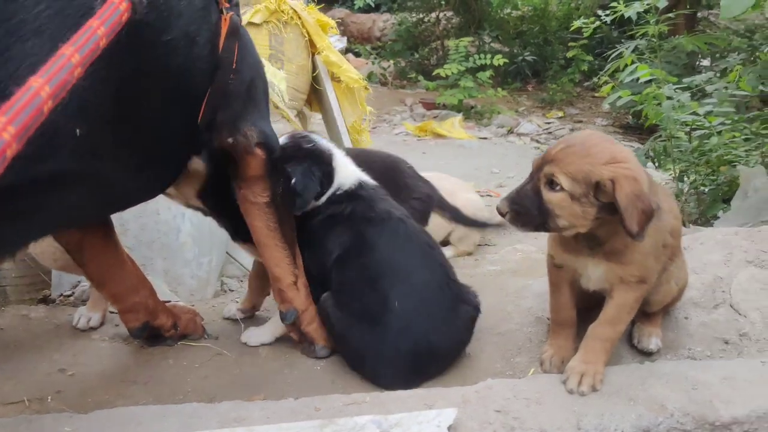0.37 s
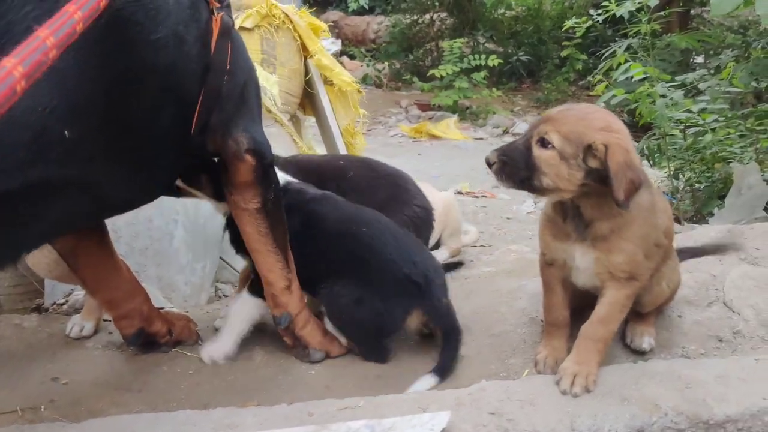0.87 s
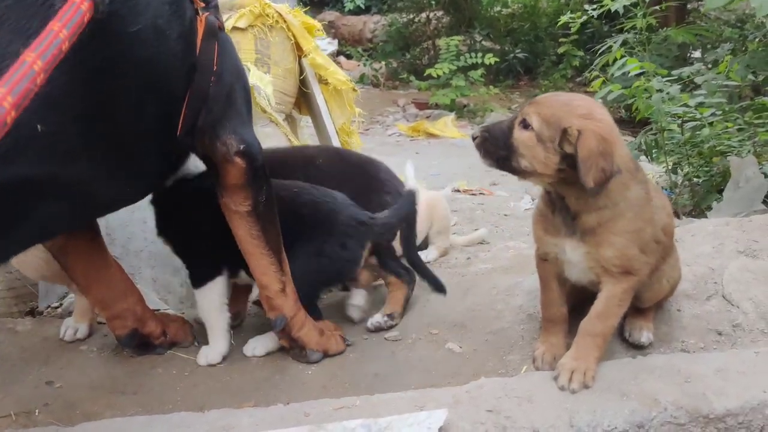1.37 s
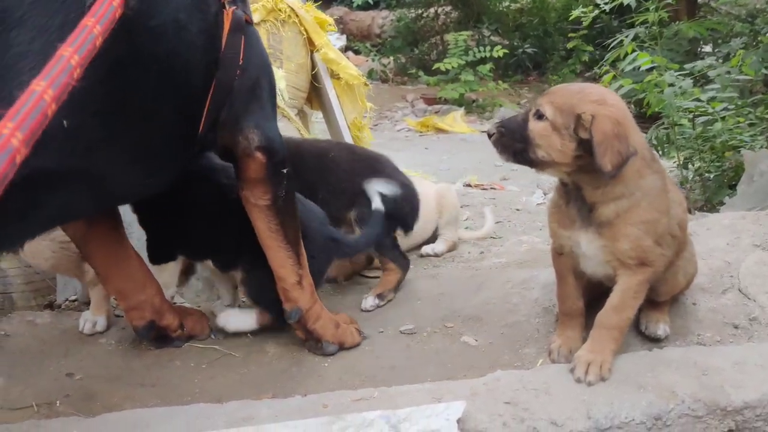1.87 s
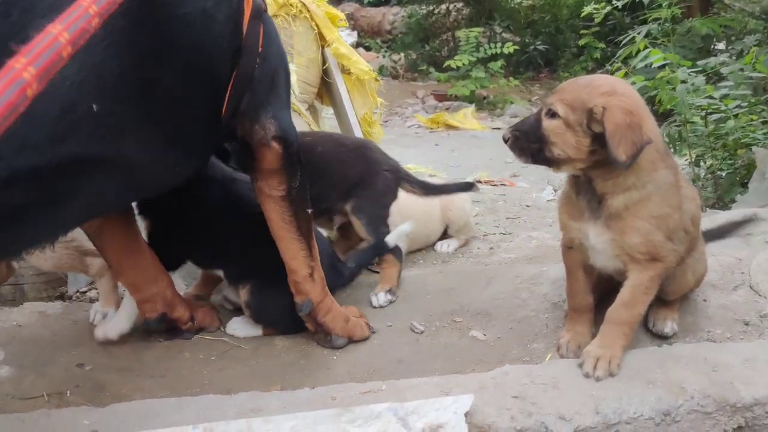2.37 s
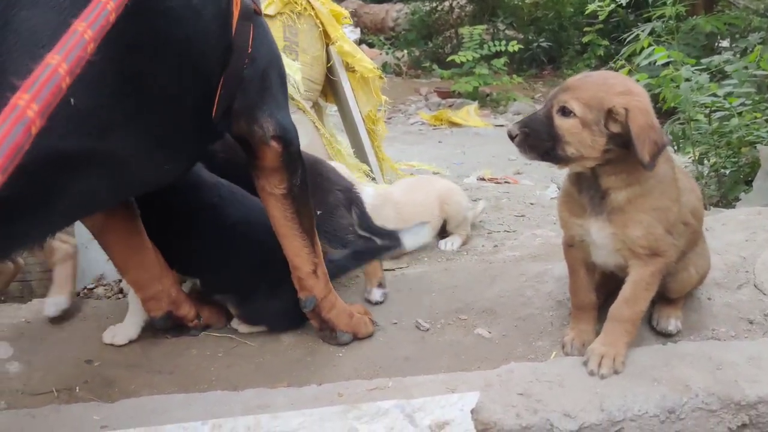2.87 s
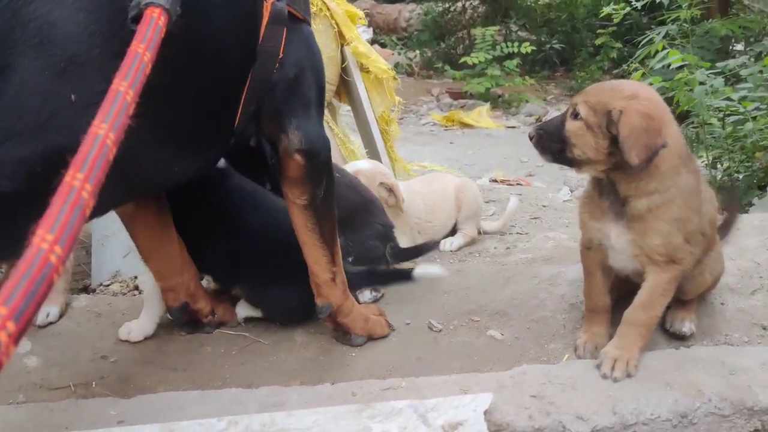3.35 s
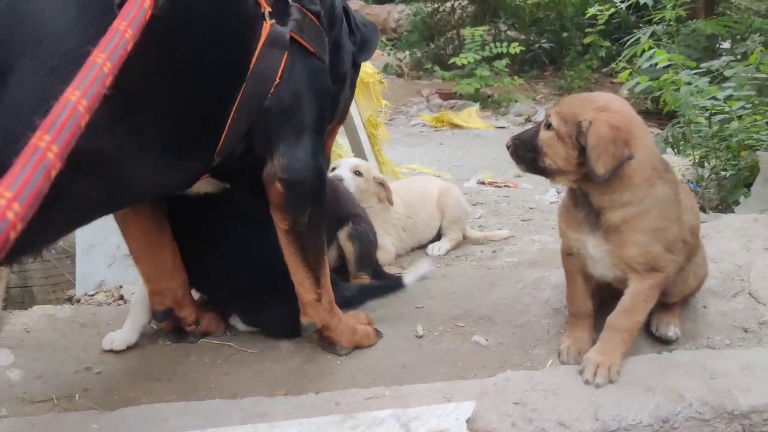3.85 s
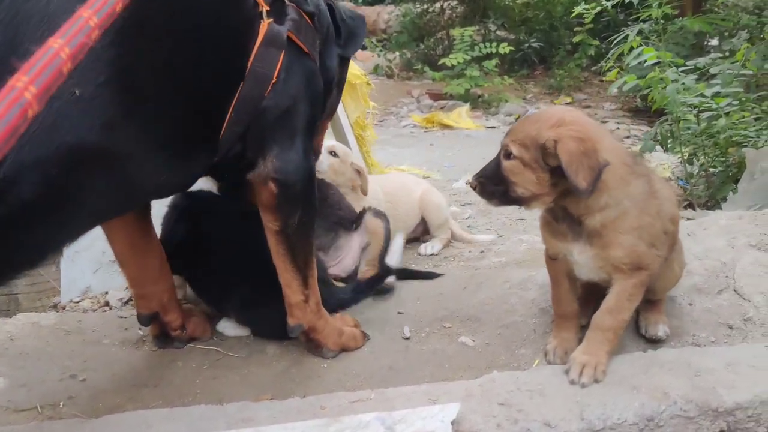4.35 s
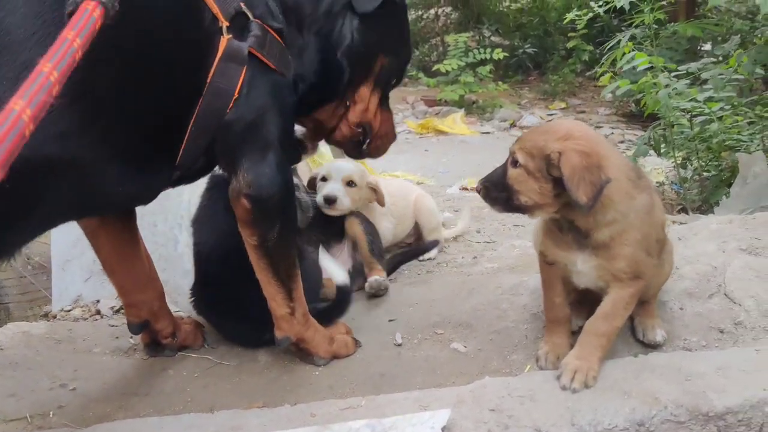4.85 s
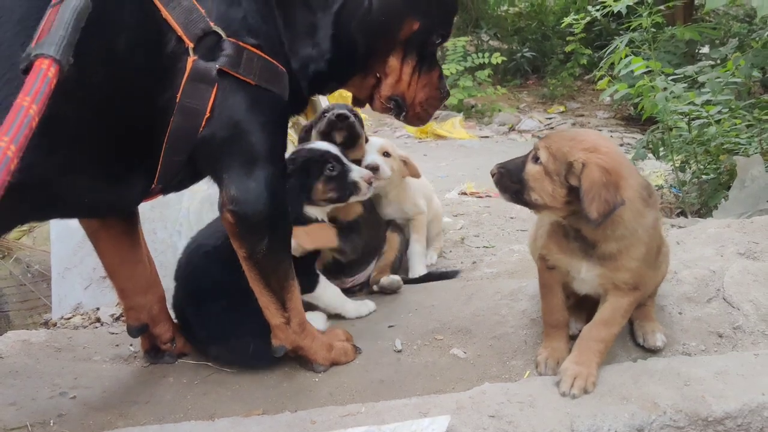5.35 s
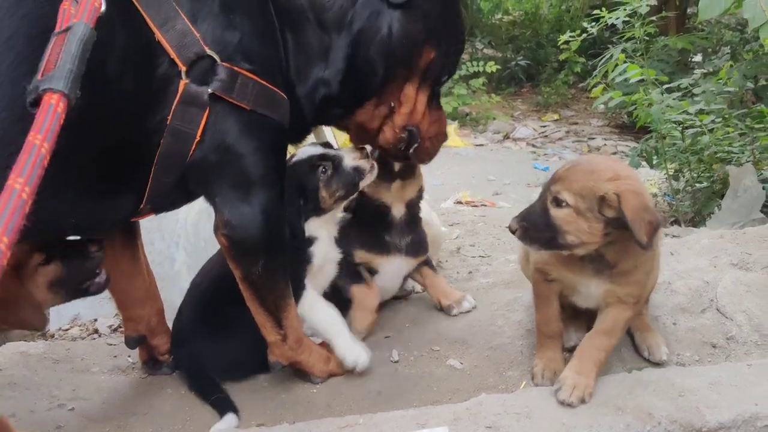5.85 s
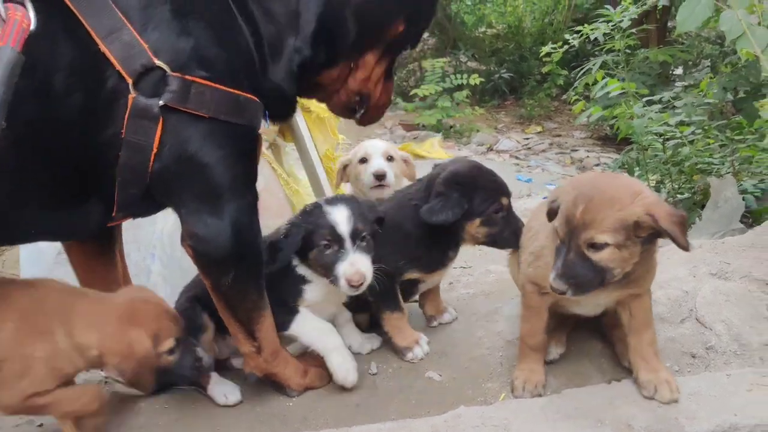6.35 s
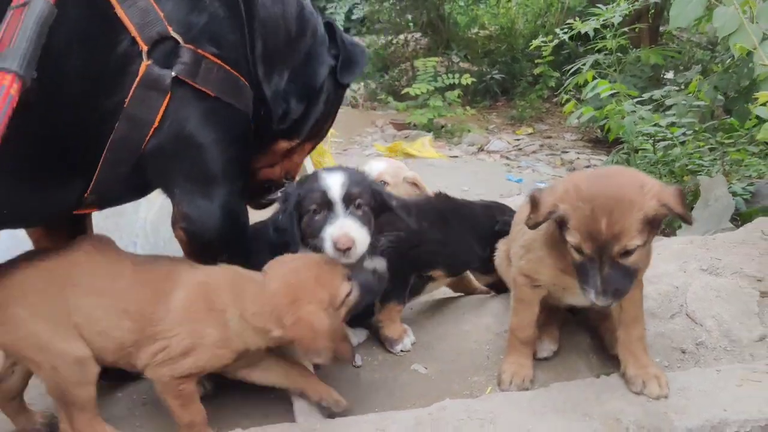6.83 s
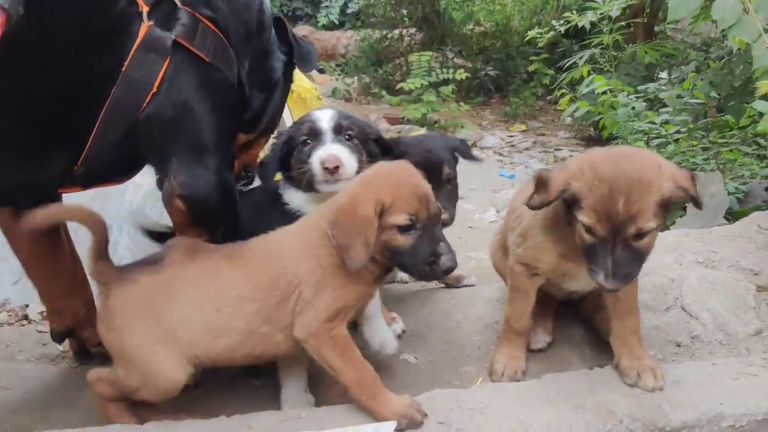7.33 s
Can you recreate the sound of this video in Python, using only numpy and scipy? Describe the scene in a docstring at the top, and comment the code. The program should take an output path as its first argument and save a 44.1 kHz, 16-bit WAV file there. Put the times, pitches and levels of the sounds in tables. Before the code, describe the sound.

A small bird repeats quick high chirps in an echoing lane over a low distant generator hum, with puppy gulp-grunts and three sharp snaps close by.

```python
"""From the start a small bird in a walled lane repeats a chirp of whistled glides, its last sweep answered by
an echo. A generator hums far off (wavering harmonics) under air noise and faint insects (narrow-band noise).
At 0.6, 1.7 and 5.7 s a puppy gulps (knocked resonances) and grunts (gliding tones) close by; paws rustle (noise).
From 3.4 s ticks (single clicks into resonances) lead into three snaps (click trains) at 3.9, 4.1 and 4.2 s.
A last tick falls at 5.1 s, the last chirp at 7.5 s. Of two microphone ports, the left hears all a little earlier."""
import sys
import numpy as np
from scipy import signal
from scipy.fft import rfft, irfft
from scipy.io import wavfile
from scipy.ndimage import uniform_filter1d

SR = 44100
rng = np.random.default_rng(int(sys.argv[2]) if len(sys.argv) > 2 else 0)


def ratio(d):
    """dB to gain"""
    e = np.asarray(d, float) / 20
    return 10 ** e


def generate_wav(sig):
    """Save sig (samples, or channels by samples) to the path in sys.argv[1] as 16-bit PCM at SR."""
    pcm = np.round(np.clip(np.atleast_2d(sig).T, -1, 1) * 32767).astype(np.int16)
    wavfile.write(sys.argv[1], SR, pcm)


N = 340046

# Bird chirps: (time [s], base level [dB], pitch factor)
CHIRPS = [(-.055, -48, 1.055), (1.243, -38, 1.033), (1.483, -36, 1.023), (1.732, -36, 1.038),
          (1.985, -36.5, 1.023), (2.237, -35, 1.03), (2.496, -36.5, 1.034), (2.763, -36, 1.016),
          (4.644, -38, 1.032), (4.895, -37, 1.01), (5.154, -36.5, 1.02), (5.415, -36.5, 1.032),
          (5.684, -37, 1.015), (7.482, -39.5, 1.027)]
# Glides of one chirp, the last row an echo of the sweep; pitches before the chirp factor and the whistle ratio:
# (time after chirp start [s], length [s], start pitch [Hz], resting pitch [Hz], base level [dB])
CHIRP_GLIDES = [(-.026, .015, 4650, 4175, -11.5), (-.006, .028, 4600, 4437, -8),
                (0.014, .018, 5750, 4574, -4.5), (0.032, .051, 5898, 3531, -5),
                (0.073, .035, 4800, 3792, -6)]
# Wall echoes of the bird: (delay [s], left level [dB], right level [dB])
WALL_ECHOES = [(.011, -5.5, -34), (.045, -24, -10.5), (.095, -32, -20)]
# Puppy grunts: (time [s], length [s], base pitch [Hz], base level [dB])
GRUNTS = [(0.556, 0.14, 195.3, -30.5), (1.725, 0.11, 199.5, -28.5), (5.734, 0.122, 186.2, -26)]
# Grunt contour, pitch sagging then climbing: (share of length, pitch factor, level [dB])
GRUNT_CONTOUR = [(0, 1.02, -6), (0.051, 1.03, -5.5), (.47, 0.94, -7), (.78, 1.12, -7.5), (1, 1.5, -18)]
# Grunt harmonics: (multiple, level [dB])
GRUNT_HARMONICS = [(1, -1.5), (2, -16)]
# Puppy gulps: (time [s], level [dB], added level of the modes above 450 Hz [dB])
GULPS = [(0.56, -27, -15), (0.656, -34, -18), (1.733, -19.5, -8.5), (1.777, -21.5, -10), (1.806, -28, -10),
         (5.738, -16, -11.5), (5.779, -30.5, -20), (5.815, -23, -4.5)]
# Throat cavity modes: (frequency [Hz], level [dB], T60 [s])
THROAT_MODES = [(372, -0.5, 0.036), (578, -12, 0.15), (770, -17, 0.046), (980, -8.5, 0.18)]
# Snap envelopes: (time [s], swell [s], peak rms before panning [dB], fall [dB/s])
SNAP_ENVELOPES = [(3.8787, 0.0064, -12.5, 1700), (4.0539, 0.0065, -14, 2100), (4.2334, 0.01, -15, 1050)]
# Snap colours, one per snap: (main resonance [Hz], width [Hz], grain rate [1/s],
# body level [dB], added body treble [dB], left minus right [dB])
SNAP_COLOURS = [(4500, 1100, 1400, -18, -4, -5.5), (4240, 1050, 1600, -25, 15, -4.5),
                (3710, 610, 2100, -29.5, 12, -3)]
# Body resonances of snaps and ticks: (frequency [Hz], width [Hz], level [dB])
CRACK_BODY = [(900, 450, -25), (1566, 470, -13.5), (2240, 630, -5), (3000, 280, -4), (8250, 1100, 8),
              (9590, 1170, 6.5), (14000, 1700, 6.5)]
# Ticks: (time [s], level [dB], main resonance [Hz], body level [dB], added body treble [dB])
TICKS = [(3.421, -47, 2320, 4, -13), (3.490, -40.5, 3600, 1, -10), (3.497, -35, 3400, -4, -14),
         (3.569, -31.5, 2550, 6, -25), (3.639, -37, 980, 5.5, -21), (3.714, -32, 2430, -3.5, -17),
         (3.844, -50, 5000, -10, 13), (3.853, -34.5, 4970, -1, 5), (3.865, -31, 4500, -21, 6),
         (3.869, -22, 4220, -22, -3), (3.874, -20, 4120, -26, -4), (3.8936, -16, 4500, 2, -10),
         (4.073, -28, 2830, -5, -21), (4.136, -38, 1060, -11, -17), (4.259, -21.5, 3370, 0, -25),
         (5.057, -38, 3003, -1, -15)]
# Rustles: (time [s], fade scale [s], scuff level [dB], leaf level over scuff, before an 8 dB cut [dB])
RUSTLES = [(0.726, 0.27, -53.5, 0), (1.207, 0.055, -51.5, 4), (3.098, 0.17, -43, -2.5),
           (3.395, 0.32, -54, -7), (3.562, 0.022, -40.5, -6), (4.41, 0.031, -55, 10),
           (4.78, 0.27, -55.5, 1), (5.272, 0.2, -53, -1), (6.782, 0.03, -57.5, 17), (6.89, .03, -61, 9)]
# Scuff spectrum: (frequency [Hz], relative density [dB per Hz])
SCUFF_SPECTRUM = [(300, 4), (700, 10.5), (1500, 1), (2900, 10), (4500, -0.5), (6000, -6)]
# Generator harmonics: (multiple, level [dB])
HUM_HARMONICS = [(1, -1), (2, -14.5), (3, -17), (4, -22.5), (5, -31), (6, -29)]
# Far traffic and air spectrum: (frequency [Hz], relative density [dB per Hz])
AIR_SPECTRUM = [(12, -34), (22, -3.5), (40, -7.5), (60, -0.5), (90, -10.5), (125, -6.5), (170, -13.5),
                (260, -17.5), (450, -21), (700, -23.5), (1100, -27.5), (2300, -25.5), (4000, -33),
                (8000, -47), (16000, -36.5)]
# Left-right likeness of diffuse noise: (frequency [Hz], likeness 0..1)
LIKENESS = [(25, 0.62), (60, 0.99), (300, 1), (1000, 0.64), (2500, 0.29), (5000, 0.067), (9000, 0.14)]
# Shadow of close sound at the left port: (frequency [Hz], level [dB])
NEAR_SHADOW = [(5500, 0), (7500, -11.5), (15000, -9)]
# Microphone housing response: (frequency [Hz], level [dB])
HOUSING = [(4800, 0), (5500, -3.5), (6300, -9), (7200, -3.5), (8200, -2), (11000, -9), (15500, -15),
           (15900, -71)]
# Port mismatch: (frequency [Hz], left minus right [dB])
PORT_MISMATCH = [(60, -1), (110, -0.5), (200, 1), (380, -1), (700, 0.5), (1290, -4), (2380, -9),
                 (4400, 2.5), (8120, 1), (15000, -1)]

WHISTLE_RATIO = 0.97  # sounding pitch over table pitch
GLIDE_SETTLE_S, GLIDE_ATTACK_S, GLIDE_RELEASE_S, GLIDE_EDGE_DB = 0.0135, 0.012, 0.0021, -25.5
GLIDE_DB_PER_KHZ = 7  # effort: louder while the pitch is still high
TURN_AWAY_S, TURN_AWAY_DB = 7.0, -4.5  # the bird has turned away: less direct sound
LANE_T60_S, LANE_TREBLE_T60_S, LANE_SPLIT_HZ = 0.62, 0.5, 4400
BIRD_LANE_DB, NEAR_LANE_DB = -2, -25
SNAP_START_DB = -6  # re peak
TICK_WIDTH_SHARE = 0.2  # resonance width over its frequency
HUM_HZ, HUM_BASE_DB, HUM_WAVER_DB, HUM_WAVER_HZ = 75.0, -36.5, 0.5, 5.6
INSECT_HZ, INSECT_PASS_WIDTH_HZ, INSECT_BASE_DB = 4740, 280, -64.5
AIR_DB = -42.5
FAR_LEFT_LEAD_S, NEAR_LEFT_LEAD_S = 0.00023, 0.00004


def bird():
    """Whistled glides from one template, varied per chirp; direct sound, wall echoes and a scattered tail."""
    early = SR // 4  # room for a chirp begun before time zero
    song = np.zeros(N + 2 * early)
    for start_s, level_db, factor in CHIRPS:
        for chirp_glide in CHIRP_GLIDES:
            rows = whistle_rows(*chirp_glide) * [1, factor, 1] + [start_s, 0, level_db]
            at, tone = glide(rows, [(WHISTLE_RATIO, 0)], wobble_db=3.2)
            song[early + at:early + at + len(tone)] += tone
    turned_away = np.arange(len(song)) > early + TURN_AWAY_S * SR
    direct = song * ratio(TURN_AWAY_DB * turned_away)
    out = direct * ratio([[0.0], [-7.0]]) + ratio(BIRD_LANE_DB) * lane(song)
    for delay_s, *side_db in WALL_ECHOES:
        out += np.roll(song, round(delay_s * SR)) * ratio(side_db)[:, None]
    return out[:, early:early + N]


def whistle_rows(start_s, length_s, from_hz, toward_hz, level_db):
    """One whistled glide: pitch sags fast, then ever slower; level eases with it between soft edges."""
    t = np.linspace(0, length_s, num=14)
    above_hz = (from_hz - toward_hz) / (1 + (t / GLIDE_SETTLE_S) ** 1.973)
    attack = np.clip(1 - t / GLIDE_ATTACK_S, 0, 1)
    release = np.clip(1 - (length_s - t) / GLIDE_RELEASE_S, 0, 1)
    effort_db = GLIDE_DB_PER_KHZ * above_hz / 1000
    glide_db = level_db + effort_db + GLIDE_EDGE_DB * (attack + release)
    return np.transpose([start_s + t, toward_hz + above_hz, glide_db])


def puppy():
    """Short closed-mouth grunts as gliding harmonics; each gulp knocks the throat cavities with a soft push."""
    out = np.zeros(N)
    for start_s, length_s, pitch_hz, level_db in GRUNTS:
        rows = np.array(GRUNT_CONTOUR) * [length_s, pitch_hz, 1] + [start_s, 0, level_db]
        at, tone = glide(rows, GRUNT_HARMONICS, wobble_db=0)
        out[at:at + len(tone)] += tone
    push = high_pass(ring_wide(signal.unit_impulse(12000), 513, 345), 420) / 18
    for start_s, level_db, upper_db in GULPS:
        knock = np.zeros(len(push))
        for hz, mode_db, t60_s in THROAT_MODES:
            knock += ratio(mode_db + upper_db * (hz > 450)) * ring(push, hz, t60_s)
        out[round(start_s * SR):][:len(push)] -= ratio(level_db) * knock
    return out


def snaps():
    """Dense uneven click trains into resonances, under a quick swell and a steep fall."""
    out, t = np.zeros((2, N)), np.arange(2400) / SR
    for colour, envelope in zip(SNAP_COLOURS, SNAP_ENVELOPES):
        hz, width_hz, grains_per_s, body_db, treble_db, pan_db = colour
        start_s, swell_s, peak_db, fall_db_per_s = envelope
        rise_db = SNAP_START_DB * (1 - t / swell_s)
        level_db = peak_db + np.minimum(rise_db, fall_db_per_s * (swell_s - t))
        chance, size, sign = rng.random((3, len(t)))
        grains = (chance < grains_per_s / SR) * (0.34 + size) * np.sign(sign - 0.5)
        grains += 0.061 * (sign - 0.5)  # noise bed
        grains[0] = 1  # the first fibre breaks at once
        sound = crack(grains, hz, width_hz, body_db, treble_db)
        sound /= np.sqrt(uniform_filter1d(sound ** 2, size=110) + 1e-9)  # the envelope sets the level
        sides = ratio(np.array([[pan_db], [-pan_db]]) / 2)
        out[:, round(start_s * SR):][:, :len(t)] += sides * sound * ratio(level_db)
    return out


def ticks():
    """Each a click plus scatter decaying with a 2 ms time constant, into resonances."""
    out, t = np.zeros(N), np.arange(1200) / SR
    for start_s, level_db, hz, body_db, treble_db in TICKS:
        clicks = 0.09 * rng.standard_normal(len(t)) * np.exp(-t / 0.002)
        clicks[0] += 1
        sound = crack(clicks, hz, TICK_WIDTH_SHARE * hz, body_db, treble_db)
        out[round(start_s * SR):][:len(t)] += ratio(level_db) * sound
    return out


def crack(clicks, hz, width_hz, body_db, treble_db):
    """Clicks ring a main resonance and the fixed body resonances around it."""
    body = np.zeros(len(clicks))
    for body_hz, body_width_hz, db in CRACK_BODY:
        body += ratio(db + treble_db * (body_hz > 6000)) * ring_wide(clicks, body_hz, body_width_hz)
    return ring_wide(clicks, hz, width_hz) + ratio(body_db) * body


def rustles():
    """Paws and leaves: fluttering noise, quick onset and Gaussian fade; leaf noise adds dry treble."""
    t, out = np.arange(N) / SR, np.zeros((2, N))
    scuff = diffuse(SCUFF_SPECTRUM + [(7000, -44)])
    leaves = diffuse([(5000, -36), (6500, -2)])
    for start_s, fade_s, level_db, leaf_db in RUSTLES:
        x = np.clip((t - start_s) / fade_s, 0, 9)
        envelope = np.minimum(8 * x, 1) * np.exp(-1.5 * x ** 2)
        out += ratio(level_db) * envelope * (scuff + ratio(leaf_db - 8.0) * leaves)
    return out * ratio(2.0 * drift(120))


def generator():
    """A steady firing tone; each harmonic wavers alone, the higher the more."""
    t = np.arange(N) / SR
    phase = 2 * np.pi * HUM_HZ * t + 0.2 * drift(0.32)
    tone = np.zeros(N)
    for k, db in HUM_HARMONICS:
        tone += ratio(db + 0.64 * k * drift(7.9)) * np.sin(k * phase + 1.079 * k * k)
    return np.sqrt(2) * tone * ratio(HUM_BASE_DB + HUM_WAVER_DB * drift(HUM_WAVER_HZ))


def insects():
    """A faint far chorus: noise in a narrow band, throbbing unevenly."""
    band = rng.standard_normal((2, N))
    for _ in range(2):
        band = ring_wide(band, INSECT_HZ, INSECT_PASS_WIDTH_HZ)
    throb_db = 3 * drift(40) + 1.5 * drift(3.4)
    return ratio(INSECT_BASE_DB + throb_db) * rms_one(band)


def air():
    """Far traffic and air: steady diffuse noise, strongest in the bass."""
    return ratio(AIR_DB) * diffuse(AIR_SPECTRUM)


def lane(x):
    """Scatter between walls: unit-energy noise tail, own in each channel; the treble dies first."""
    t = np.arange(round(0.9 * SR)) / SR
    noise = rng.standard_normal((2, len(t)))
    treble = high_pass(high_pass(noise, LANE_SPLIT_HZ), LANE_SPLIT_HZ)
    tail = (noise - treble) * ratio(-60 * t / LANE_T60_S) + treble * ratio(-60 * t / LANE_TREBLE_T60_S)
    tail *= 1 - np.exp(-t / 0.00067)
    tail /= np.sqrt(np.sum(tail[0] ** 2))
    return signal.fftconvolve(x[None], tail, axes=1)[:, :x.size]


def diffuse(spectrum):
    """Two-channel coloured noise of rms 1, alike in the bass, mostly unrelated in the treble."""
    hz = np.fft.rfftfreq(N, 1 / SR)
    mid, side = rfft(rng.standard_normal((2, N))) * ratio(at_hz(spectrum, hz))
    alike = np.clip(at_hz(LIKENESS, hz), 0, 1)
    return rms_one(irfft(np.sqrt(1 + alike) * mid + np.sqrt(1 - alike) * side * [[1], [-1]], N))


def glide(rows, harmonics, wobble_db):
    """Harmonic tone along (time [s], pitch [Hz], level [dB]) rows; returns start sample and sound."""
    s, hz, level_db = np.transpose(rows)
    at = round(s[0] * SR)
    t = np.arange(at, round(s[-1] * SR)) / SR
    phase = 2 * np.pi * (np.cumsum(np.interp(t, s, hz)) / SR + rng.random())
    tone = sum(ratio(db) * np.sin(k * phase) for k, db in harmonics)
    wobbled_db = level_db + wobble_db * rng.standard_normal(len(s))
    level = ratio(np.interp(t, s, wobbled_db))
    return at, np.sqrt(2) * tone * level * signal.windows.tukey(len(t), 0.15)


def ring(clicks, hz, t60_s):
    """Two-pole resonance: a unit click starts a decaying sine of height 1."""
    r, w = ratio(-60 / (t60_s * SR)), 2 * np.pi * hz / SR
    return signal.lfilter([0, np.sin(w)], [1, -2 * r * np.cos(w), r * r], clicks + 1e-18)


def ring_wide(clicks, hz, width_hz):
    """A resonance passed twice, for steep flanks; a unit click peaks near 1."""
    t60_s = np.log(1000) / (np.pi * width_hz * 1.55)
    return ring(ring(clicks, hz, t60_s), hz, t60_s) * 26 * width_hz / SR


def high_pass(x, hz):
    """Second-order bass cut."""
    return signal.sosfilt(signal.butter(2, hz, "high", fs=SR, output="sos"), x)


def drift(corner_hz):
    """Random wander of rms 1: noise through two equal low-pass poles, run at SR / 40."""
    r = np.exp(-2 * np.pi * corner_hz * 40 / SR)
    noise = rng.standard_normal(N // 40 + 2002)
    slow = rms_one(signal.lfilter([1], [1, -2 * r, r * r], noise)[2000:])
    return np.interp(np.arange(N) / 40, np.arange(len(slow)), slow)


def rms_one(x):
    """Scale to rms 1."""
    return x / np.sqrt(np.mean(x ** 2) + 1e-20)


def at_hz(points, hz):
    """Read a (frequency [Hz], value) table on a log-frequency axis."""
    table_hz, values = np.transpose(points)
    return np.interp(np.log(hz + 1), np.log(table_hz), values)


def late_right(x, lead_s, left_colour):
    """Port spacing: the right hears later by lead_s; the left may be shadowed."""
    hz = np.fft.rfftfreq(N, 1 / SR)
    delay = np.exp(-2j * np.pi * hz * lead_s)
    return irfft(rfft(x) * [ratio(at_hz(left_colour, hz)), delay], N)


def scene():
    """All sources at the two ports, near and far with their own lead."""
    sharp = high_pass(snaps() + ticks(), 850)
    dog = puppy()
    near = sharp + dog * ratio([[-1.5], [1.5]])
    near = near + ratio(NEAR_LANE_DB) * lane(sharp.mean(axis=0) + dog)
    far = bird() + rustles() + generator() + insects() + air()
    near_ports = late_right(near, NEAR_LEFT_LEAD_S, NEAR_SHADOW)
    return near_ports + late_right(far, FAR_LEFT_LEAD_S, [(1, 0)])


def roll_off(x):
    """The treble ends steeply here."""
    return signal.sosfilt(signal.butter(12, 16520, fs=SR, output="sos"), x)


def record(dry):
    """The housing dulls the treble, with a dip near 6.3 kHz; each port has its own colour."""
    hz = np.fft.rfftfreq(N, 1 / SR)
    port_db = at_hz(PORT_MISMATCH, hz) / 2 * np.array([[1], [-1]])
    mix = irfft(rfft(dry) * ratio(at_hz(HOUSING, hz) + port_db), N)
    return roll_off(mix)


dry = scene()
out = record(dry)
generate_wav(out)
```